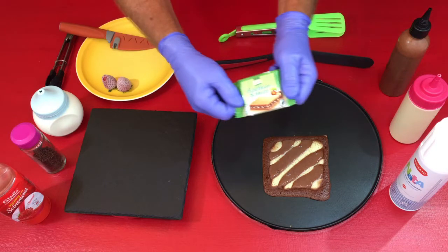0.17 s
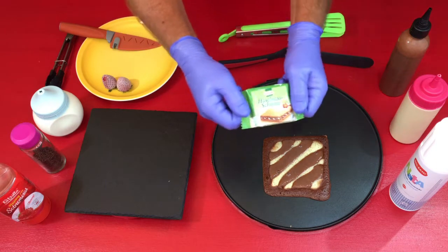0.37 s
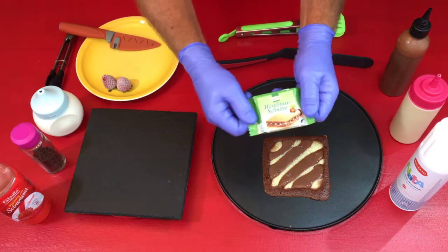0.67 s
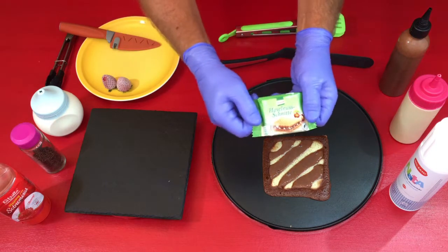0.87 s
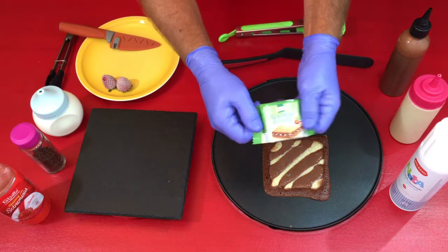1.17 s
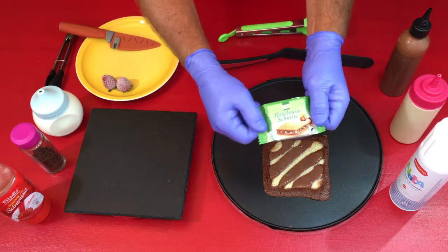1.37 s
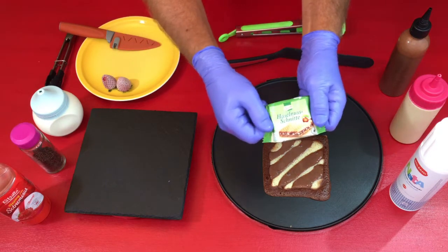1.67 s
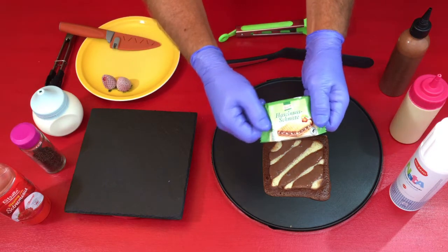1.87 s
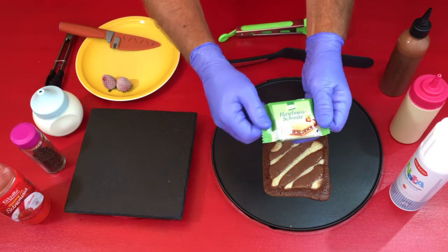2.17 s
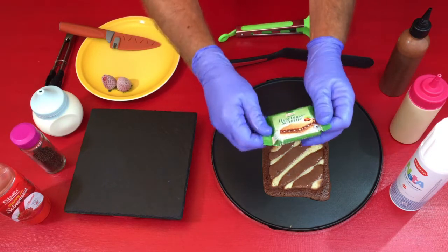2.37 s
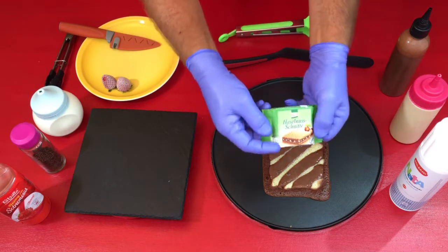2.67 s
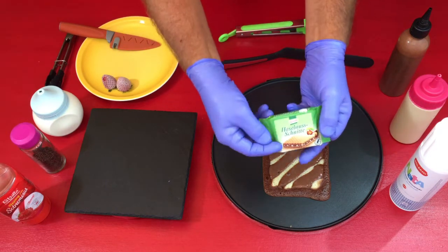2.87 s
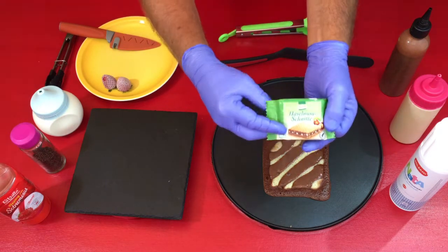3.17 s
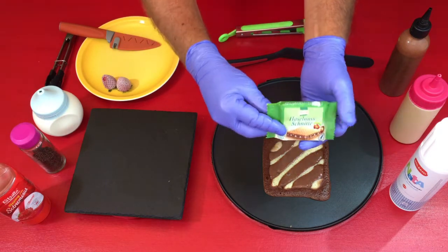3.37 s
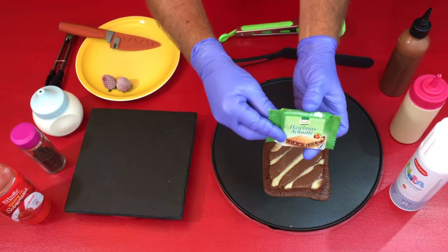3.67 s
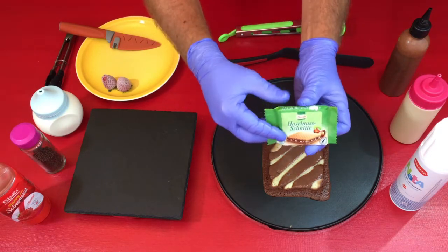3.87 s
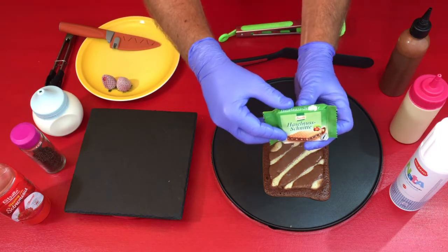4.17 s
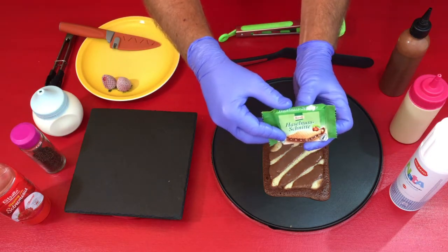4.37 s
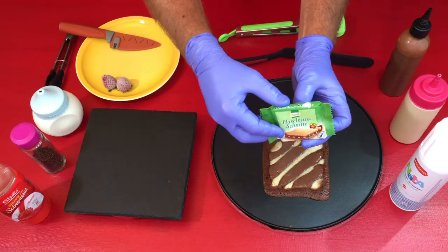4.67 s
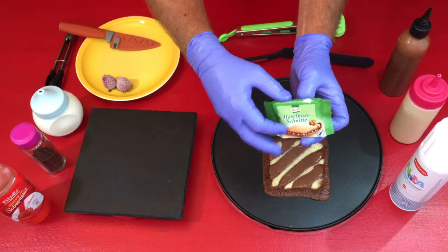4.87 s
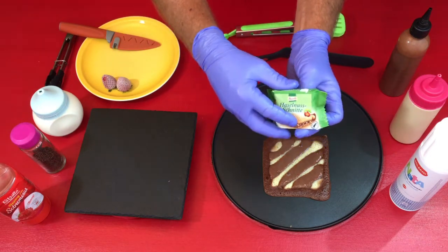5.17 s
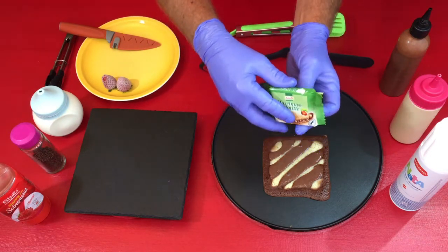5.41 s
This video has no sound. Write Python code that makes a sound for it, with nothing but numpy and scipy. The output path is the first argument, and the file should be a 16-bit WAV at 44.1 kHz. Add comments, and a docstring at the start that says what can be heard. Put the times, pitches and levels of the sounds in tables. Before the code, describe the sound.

Gloved fingers handle a crisp plastic packet in a small quiet room, bright crackles thinning out before a single sharp knock.

```python
"""Plastic wrapper in a small quiet room

Gloved hands work a small plastic wrapper open above a table, close to the microphone.
Creases snap singly, in quick runs and as fine crackle: each is a spike and noise shaped into four bands.
Gloves rub and fingers pat as low noise and wavering tones; a dull bump rings low, one knock rings a hard plate.
Decaying noise answers the creases, pats and knock as echo, over steady room tone."""
import sys
import numpy as np
from scipy import signal
from scipy.fft import rfft, irfft, next_fast_len
from scipy.io import wavfile
from scipy.ndimage import map_coordinates

SR = 44100
rng = np.random.default_rng(int(sys.argv[2]) if len(sys.argv) > 2 else 0)


def digitize_waveform(pressure):
    """Quantize a signal to 16-bit integers and store it at the path in sys.argv[1].

    Rows of a 2-D input are taken as channels; values are limited to [-1, 1].
    """
    field = np.atleast_2d(pressure).T
    bounded = np.clip(field, -1, 1)
    quanta = np.round(bounded * 32767).astype(np.int16)
    wavfile.write(sys.argv[1], SR, quanta)


N = 244314  # length [samples]


def amp(db):
    """Turn decibels into a gain."""
    return 10 ** (np.asarray(db) / 20)


def along(points, hz):
    """Read a curve of (frequency, value) points along a logarithmic frequency axis."""
    f, v = np.transpose(points)
    return np.interp(np.log(hz + 1), np.log(f + 1), v)


def filtered(x, response):
    """Weight the spectrum of x by a response, which is a function of frequency."""
    m = next_fast_len(N + 8192)
    hz = np.fft.rfftfreq(m, 1 / SR)
    return irfft(rfft(x, m) * response(hz), m)[..., :N]


def band(x, order, hz, kind):
    """Pass x through a Butterworth filter."""
    return signal.sosfilt(signal.butter(order, hz, kind, fs=SR, output="sos"), x)


def placed(s, rows):
    """Sum short sounds, one per row, at their start times."""
    at = np.round(s * SR).astype(int)[:, None] + np.arange(rows.shape[1])
    return np.bincount(at.ravel(), rows.ravel(), N + SR)[:N]


def ring(s, hz, db, t60, attack):
    """One damped mode: a sine from time s that rises quickly and dies away exponentially."""
    t = np.clip(np.arange(N) / SR - s, 0, None)
    return amp(db - 60 * t / t60) * np.sin(2 * np.pi * hz * t) * (1 - np.exp(-t / attack))


# Spectrum shape of the room tone: (frequency [Hz], relative density [dB per Hz])
AIR = [(15, -46), (30, -4), (55, 5), (160, -1), (320, -3), (500, -13.5), (900, -14), (1500, -15),
       (3200, -32), (4800, -34), (6300, -17), (12600, -12), (15500, -10), (17000, -46)]
AIR_DB = -70  # rms level of the room tone


def air():
    """Steady room tone: noise with a fixed spectrum."""
    tone = filtered(rng.standard_normal(N), lambda hz: amp(along(AIR, hz)))
    return amp(AIR_DB) * tone / np.std(tone)


# How fast the room's echo dies: (frequency [Hz], time to fall 60 dB [s])
WALLS = [(300, 0.84), (800, 0.31), (2100, 0.25), (5500, 0.23), (14600, 0.16)]
# Colour of the echo as it starts: (frequency [Hz], relative level [dB])
ECHO = [(200, -6.5), (1000, 3.5), (1700, 2.5), (3200, 5.5), (4800, 1.5), (6300, 5), (9000, 0), (13000, 8),
        (16000, -4.5)]


def room(x, count=8, size=2048):
    """The walls answer with decaying noise; the hands move, so successive moments meet other echo patterns."""
    hz, t, z = signal.stft(rng.standard_normal((count, SR // 2)), SR, nperseg=256)
    fade_db = along(ECHO, hz)[:, None] - 60 * t / along(WALLS, hz)[:, None]
    tails = signal.istft(z * amp(fade_db), SR, nperseg=256)[1]
    tails = tails * (1 - np.exp(-np.arange(tails.shape[1]) / SR / 0.00023))
    tails = tails / np.linalg.norm(tails[0])
    # the patterns take turns, each for one block of samples
    turn = np.arange(N) // size % count == np.arange(count)[:, None]
    return signal.fftconvolve(x * turn, tails, axes=1).sum(0)[:N]


# How hard the fingers work the film, also used by crackle and ticks: (time [s], level [dB])
HANDLING = [(0.0, -55), (0.45, -47.5), (0.72, -49), (0.89, -57.5), (1.13, -61), (1.27, -48), (1.33, -46),
            (1.48, -63), (1.7, -67), (1.83, -49), (2.01, -48.5), (2.22, -66.5), (2.45, -60), (2.57, -55),
            (2.78, -64.5), (2.89, -67.5), (3.32, -58), (3.56, -67.5), (3.81, -68), (4.1, -71.5),
            (4.23, -60.5), (4.86, -62), (4.94, -58), (5.54, -63)]


def handling_db(s):
    """Handling level at the times s."""
    return np.interp(s, *np.transpose(HANDLING))


def gloves():
    """Low rub of the gloves: band noise that swells gently with the handling and wavers at random."""
    effort_db = handling_db(np.arange(N) / SR)
    # 25 random points a second, joined smoothly
    lumps_db = 2.1 * map_coordinates(rng.standard_normal(200), [np.arange(N) * 25 / SR])
    rub = band(rng.standard_normal(N), 2, (120, 450), "bandpass")
    return amp(0.4 * effort_db - 52 + lumps_db) * rub / np.std(rub)


# Fingers pat the packet: (time [s], level before a common lift [dB], centre pitch [Hz])
THUDS = [(0.028, -47.5, 600), (0.158, -50, 284), (0.241, -66, 315), (0.389, -48, 710), (0.536, -36.5, 628),
         (0.63, -41, 641), (0.772, -46, 587), (0.836, -50, 417), (1.068, -50, 570), (1.335, -50, 307),
         (1.657, -52.5, 605), (1.786, -49, 317), (1.924, -48, 322), (2.114, -52, 360), (2.657, -43, 678),
         (3.299, -53, 573), (4.241, -52, 533), (4.54, -56, 392), (4.814, -51, 190), (4.968, -46.5, 642),
         (5.335, -52.5, 645), (5.452, -54, 393)]
THUD_LIFT_DB = 1.5


def thuds():
    """Soft pats: a short tone whose phase wanders, so it spreads into a puff around one dull pitch."""
    s, db, hz = np.transpose(THUDS)
    t = np.arange(3000) / SR
    wander = np.cumsum(0.14 * rng.standard_normal((len(s), len(t))), axis=1)
    tone = np.sin(2 * np.pi * hz[:, None] * t + wander)
    puff = tone * (1 - np.exp(-t / 0.0019)) * amp(-60 * t / 0.052)
    return placed(s, amp(db + THUD_LIFT_DB)[:, None] * puff)


# A soft bump on the table and its low ring: (time [s], frequency [Hz], level [dB], time to fall 60 dB [s])
BUMPS = [(1.695, 430, -52, 0.12), (1.7, 318, -49, .1), (1.7, 326, -61, 0.99)]


def bumps():
    """A dull bump whose faint ring lingers: a few low damped modes."""
    return sum(ring(*row, attack=0.003) for row in BUMPS)


KNOCK_S, KNOCK_DB = 4.2433, -18  # time [s]; gain over the whole blow [dB]
# Modes of the hard plate: (frequency [Hz], level before the knock's gain [dB], time to fall 60 dB [s])
PLATE = [(315, -41.5, 0.72), (454, -35.5, 1), (560, -17, 0.067), (627, -27.5, 0.37), (831, -23.5, 0.27),
         (954, -29, 0.49), (1143, -24.5, 0.34), (1647, -6, 0.037), (2850, -2, 0.046), (3250, -1.5, 0.078),
         (3680, 8, 0.024), (4030, 1, 0.035), (5320, 1, 0.032), (6220, 9, 0.03), (7170, 3, 0.033)]


def knock():
    """A hard blow: a broad crack over the plate's modes; the walls hear mostly the bare blow."""
    t = np.clip(np.arange(N) / SR - KNOCK_S, 0, None)
    contact = np.arange(N) == round((KNOCK_S + .0004) * SR)  # a single-sample impulse
    rattle = amp(-60 * t / .022) * (1 - np.exp(-t / .0004)) * rng.standard_normal(N)
    # row 0 reaches the microphone directly, row 1 goes to the walls
    both = np.array([amp(3) * rattle + amp(13) * contact, amp(33) * contact])
    body = band(both, 2, (1300, 7500), "bandpass")
    edge = band(both, 2, 8000, "highpass")
    modes = sum(ring(KNOCK_S, *mode, attack=.0003) for mode in PLATE)
    blow = amp(KNOCK_DB) * (body - amp(-11.5) * edge + modes * amp([[0], [-9]]))
    return band(blow, 4, 240, "highpass")


# Bands of one crease [Hz], from the packet's dull body up to the crack
BODY, POP, PANEL, CRACK = (350, 950), (950, 2500), (2300, 7200), (6800, 16000)
BODY_DB = -18  # body relative to the pop
PANEL_DB, PANEL_LOSS = -1.5, 0.52  # panel in an even crease [dB]; dB lost per dB of brightness either way


def parts(level_db, bright_db):
    """Pop and crack share a crease's power by its brightness; the panel is strongest when they are even."""
    def share_db(over_db):
        return -10 * np.log10(1 + amp(over_db) ** 2)

    panel_db = PANEL_DB - PANEL_LOSS * np.abs(bright_db)
    return level_db + np.array([share_db(bright_db), panel_db, share_db(-bright_db)])


def facet_hz(pitch):
    """Spread numbers from 0 to 1 over facet rings from 1200 to 8400 Hz."""
    return 1200 * 7 ** pitch


def creases(s, part_db, ring_hz, ring_share=.7, spike=3):
    """A crease flips: a spike, a short rattle and the ring of the freed facet; the body fades slowest.
    Row 0 goes straight to the microphone; row 1, the bare spike, is the mean colour sent out to all sides."""
    t = np.arange(500) / SR
    shake = rng.standard_normal((len(s), len(t)))
    shake[:, 0] = spike * np.sign(shake[:, 0])
    shake += ring_share * np.sin(2 * np.pi * ring_hz[:, None] * t)
    both = np.array([shake, shake * (t == 0)])
    pop_db, panel_db, crack_db = part_db
    layers = [(-1, BODY, pop_db + BODY_DB, 0.082), (1, POP, pop_db, .012),
              (-1, PANEL, panel_db, 0.014), (1, CRACK, crack_db, 0.01)]  # sign, band, dB, t60 [s]
    rows = np.zeros(both.shape)
    # alternate signs let neighbouring parts meet in phase
    for sign, edges, db, t60 in layers:
        part = band(both * amp(-60 * t / t60), 2, edges, "bandpass")
        part /= np.linalg.norm(part, axis=2, keepdims=True)
        # a part carries the energy of its rms level held for 135 samples
        rows += sign * np.sqrt(135) * amp(db)[:, None] * part
    return np.array([placed(s, row) for row in rows])


def crackle(count=3000):
    """Many tiny creases at random moments, louder where the fingers work harder."""
    s, pitch = rng.random((count, 2)).T
    size_db = 2.5 * rng.exponential(size=count).clip(0, 3)
    colour_db = 1.1 * rng.standard_normal((count, 3))
    s = s * N / SR
    level_db = handling_db(s) + size_db
    part_db = level_db + np.array([[-22], [-16], [-16]]) + colour_db.T  # pop, panel, crack
    return creases(s, part_db, facet_hz(pitch))


# least tick level over the handling, scale of the random rise above it, mean crack over pop [dB]
TICK_DB, TICK_SCATTER_DB, TICK_BRIGHT_DB = -4.5, 3, 7


def ticks(count=250):
    """Small single creases at random moments, each with its own size and brightness."""
    s, pitch, size = rng.random((count, 3)).T
    s = s * N / SR
    level_db = handling_db(s) + TICK_DB - TICK_SCATTER_DB * np.log(1 - .95 * size)
    bright_db = TICK_BRIGHT_DB + 24 * (pitch - .5)  # higher rings come with brighter ticks
    return creases(s, parts(level_db, bright_db), facet_hz(pitch))


# Quick runs of creases as a fold rolls over:
# (start [s], length [s], level of the strongest creases [dB], mean brightness: crack over pop [dB])
RUNS = [(.328, 0.024, -46, 3), (.518, 0.034, -44, 8), (1.07, 0.032, -48, 16), (1.96, 0.023, -47.5, 8),
        (2.11, 0.028, -49, 5), (1.24, .03, -46, 11), (1.42, 0.028, -50, 14), (1.775, .04, -49, 2),
        (4.76, 0.058, -52, 6), (4.942, .028, -62, -9), (5.094, .05, -50, 9), (5.342, 0.057, -65, -12),
        (5.43, 0.055, -54, 0), (5.482, 0.054, -53.5, 3)]


def runs(count=14):
    """A rolling fold lets go of many creases in quick succession."""
    s, length, level_db, bright_db = np.repeat(RUNS, count, axis=0).T
    when, size, pitch = rng.random((len(s), 3)).T
    part_db = parts(level_db - 8 * size, bright_db + 14 * (pitch - .5))
    return creases(s + length * when, part_db, facet_hz(pitch))


# Clear single creases, near the microphone:
# (time [s], level of pop and crack together [dB], brightness: crack over pop [dB], facet ring [Hz])
SNAPS = [(0.0015, -34, 4.5, 3750), (0.0292, -38, -1, 3730), (0.0688, -49.5, 8, 5800),
         (0.1127, -48, 17, 9210), (0.1337, -45, 9, 9000), (0.1493, -43.5, 7, 6070), (0.16, -37.5, 6, 1970),
         (0.1774, -38, 2.5, 2570), (0.2307, -37.5, 1, 1580), (0.2433, -31.5, -0.5, 1610),
         (0.2798, -40, 16, 8580), (0.305, -40.5, 5, 2250), (0.3309, -38, 3, 1880), (0.3382, -38, 14, 5240),
         (0.3418, -35.5, 3, 1610), (0.3929, -37.5, -20, 1080), (0.4108, -43, -17, 1830),
         (0.422, -31, 8.5, 9600), (0.4446, -40.5, 10, 6950), (0.46, -37, 9, 3870), (0.466, -37, 11.5, 4620),
         (0.523, -38, 2, 3270), (0.5278, -35, 3, 1370), (0.5363, -31.5, 4.5, 1310),
         (0.5464, -34.5, 4, 6040), (0.6041, -41.5, -8, 3960), (0.619, -36.5, 22, 3890),
         (0.6355, -34, 4.5, 1730), (0.656, -47, 16, 2370), (0.7035, -38.5, 9, 9400),
         (0.7167, -44.5, 9, 5850), (0.7638, -43.5, -14, 1560), (0.7794, -34.5, 11, 4200),
         (0.836, -41.5, 4, 5500), (0.8394, -38.5, -1, 6440), (0.8569, -32, 2.5, 3280),
         (0.924, -49.5, 7, 2090), (0.9408, -52, 5, 3880), (0.9787, -55.5, 2, 3340),
         (1.0647, -47, -24, 2670), (1.074, -29, 10, 9400), (1.081, -35.5, 9, 5240),
         (1.0927, -25.5, 14.5, 9070), (1.1237, -44, 23, 8340), (1.1734, -43, -29, 2140),
         (1.1891, -33, 1, 2600), (1.2144, -39.5, 7, 3880), (1.2445, -38, 18, 4300),
         (1.2542, -41.5, 1.5, 5910), (1.26, -36, 11, 9350), (1.3035, -38.5, 24, 5900),
         (1.3136, -46, -12, 2210), (1.346, -34, 11.5, 5700), (1.3684, -34.5, 2, 1510),
         (1.4155, -40, 5, 6000), (1.4359, -31.5, 7, 4540), (1.4595, -31.5, 8, 9200), (1.6466, -45, 6, 1310),
         (1.6743, -49.5, -1, 1770), (1.6815, -42, 6, 9250), (1.6945, -30, 11, 5340), (1.7881, -34, 7, 5350),
         (1.801, -32.5, 5, 4450), (1.8707, -39, 11, 3470), (1.8927, -41, 7, 9280), (1.9276, -44, 11, 3280),
         (1.9367, -31.5, 12.5, 5200), (1.9637, -42, 4, 1230), (1.97, -38.5, 3, 4190),
         (2.0096, -48, 14, 6970), (2.057, -39, 33, 6840), (2.0953, -50, 8, 8900), (2.1212, -39.5, 11, 9000),
         (2.1281, -33.5, 6, 1660), (2.1599, -46.5, 3, 6550), (2.2505, -46.5, 16, 1700),
         (2.2687, -52, 7, 9030), (2.3843, -60, 9, 4630), (2.3955, -53.5, 10, 6860),
         (2.438, -49.5, 8.5, 2950), (2.4653, -40.5, 9.5, 5770), (2.4926, -48, 13, 7040),
         (2.5042, -43.5, 26, 5760), (2.525, -51, 24, 8650), (2.558, -32, 18, 6020),
         (2.568, -32.5, 12, 3050), (2.6259, -27, 19, 6200), (2.6599, -38.5, -2, 1380),
         (2.6728, -40.5, 10, 3200), (2.7209, -46, 0.5, 3240), (2.8539, -44.5, -5, 3370),
         (2.8752, -49.5, 7, 2680), (2.9014, -47.5, 12, 5870), (2.9243, -47.5, 17, 5780),
         (2.971, -47, 11, 6190), (2.977, -48, -21, 1430), (3.0696, -43, 11, 9200), (3.088, -50, -11, 2820),
         (3.1036, -45, 0, 2070), (3.1322, -37.5, 5, 1690), (3.251, -43.5, 12, 6600),
         (3.291, -36.5, 1, 4000), (3.3023, -45, -4, 3280), (3.3717, -45, 17, 6510), (3.3853, -47, -4, 3680),
         (3.4541, -33.5, 11, 9500), (3.4703, -47.5, 8, 5900), (3.6454, -62, 22, 9450),
         (3.8012, -59, 20, 5400), (3.8272, -52, -10, 1150), (3.8408, -53.5, 7, 3310),
         (3.877, -58.5, 7, 8530), (3.9524, -57, 20, 6310), (4.0334, -34.5, 9.5, 3300),
         (4.0393, -28, 16, 6700), (4.1305, -49, 23, 9600), (4.1743, -57.5, 25, 5380),
         (4.2208, -57, 16, 7350), (4.3936, -38, 11.5, 6240), (4.403, -49, -17, 2810), (4.432, -51, 9, 2710),
         (4.5145, -32.5, 14.5, 1820), (4.538, -35, 5.5, 2850), (4.5474, -42, -1.5, 4440),
         (4.561, -50, 17, 8940), (4.654, -58, 23, 5350), (4.6704, -52.5, -5, 3120),
         (4.718, -49.5, 8.5, 5890), (4.748, -23, 17.5, 8870), (4.7575, -25, 20.5, 5600),
         (4.7964, -39.5, 9, 5250), (4.8152, -44.5, 3, 5190), (4.9717, -34.5, -3.5, 1740),
         (4.9983, -29, 8.5, 9000), (5.01, -48, -10, 1460), (5.0993, -34.5, 10.5, 6300),
         (5.1152, -43, 14, 5700), (5.1337, -47.5, 13, 3250), (5.186, -52.5, 5, 6680),
         (5.2128, -52, 18, 6200), (5.2472, -42.5, 5.5, 3920), (5.3018, -55, 20, 5660),
         (5.3388, -41, -6.5, 1215), (5.429, -53.5, 4, 3110), (5.4604, -54, 15, 3610),
         (5.4716, -51.5, -4, 3100), (5.4887, -47.5, -2, 1670), (5.515, -40.5, 4.5, 8690)]
PANEL_RING_DB = 2.5  # extra panel level when the facet's ring falls in the panel's band


def snaps(count=3):
    """The single clear snaps; each comes with a few weaker neighbours, mostly just after it."""
    s, level_db, bright_db, ring_hz = np.transpose(SNAPS)
    part_db = parts(level_db, bright_db)
    part_db[1] += PANEL_RING_DB * ((ring_hz > PANEL[0]) & (ring_hz < PANEL[1]))
    main = creases(s, part_db, ring_hz, ring_share=.8, spike=7)
    lag, size, pitch = rng.random((len(s) * count, 3)).T
    near_s = np.abs(np.repeat(s, count) + 0.02 * lag - .004)  # 4 ms before to 16 ms after
    # the earliest neighbours are weaker still
    near_db = np.repeat(part_db, count, axis=1) - 8.5 - 16 * size - 6 * (lag < .18)
    return main + creases(near_s, near_db, facet_hz(pitch))


def scene():
    """Direct sound, its echo from the walls, and the low layers and room tone that send no echo."""
    near, spread = snaps() + runs() + ticks() + crackle() + knock() + thuds()
    echo = amp(-8.5) * room(spread)
    return (near + echo + bumps() + gloves() + air())[None]


TOP_HZ = 15900  # the microphone's band limit
NOTCH_HZ, NOTCH_WIDTH_HZ, NOTCH_SHARE = 10400, 260, .45  # a dip in its response; share of amplitude lost


def record(dry):
    """The microphone has one shallow notch and falls off steeply above its band limit."""
    def response(hz):
        notch = 1 - NOTCH_SHARE * np.exp(-((hz - NOTCH_HZ) / NOTCH_WIDTH_HZ) ** 2)
        return notch / (1 + (hz / TOP_HZ) ** 60)

    return filtered(dry, response)


dry = scene()
out = record(dry)
digitize_waveform(out)
```